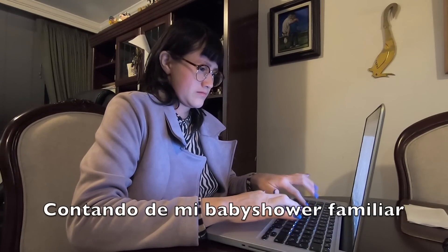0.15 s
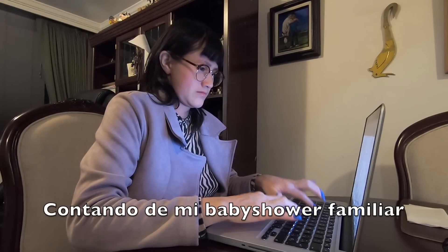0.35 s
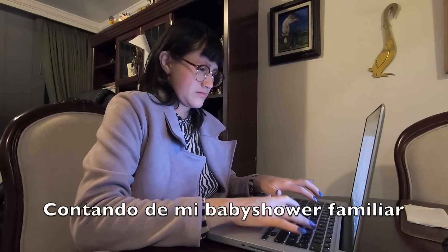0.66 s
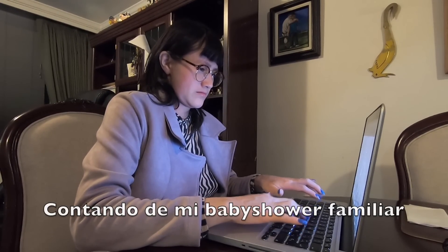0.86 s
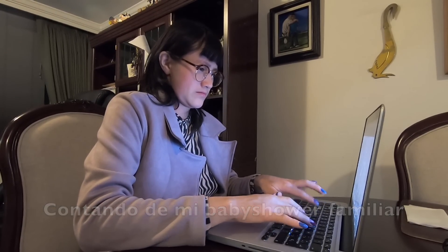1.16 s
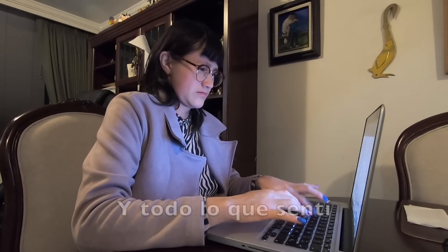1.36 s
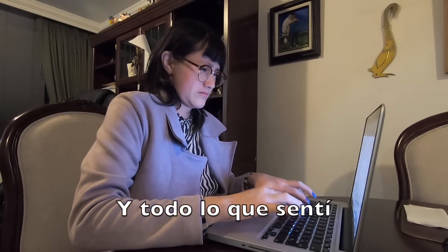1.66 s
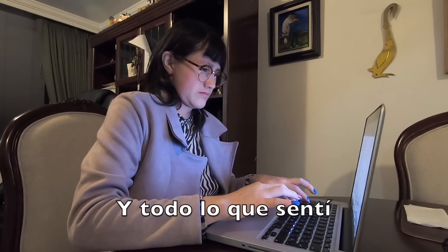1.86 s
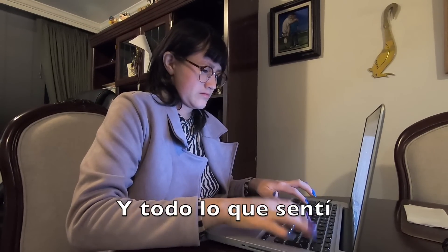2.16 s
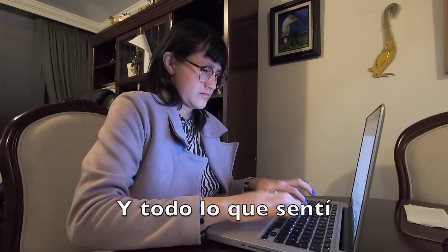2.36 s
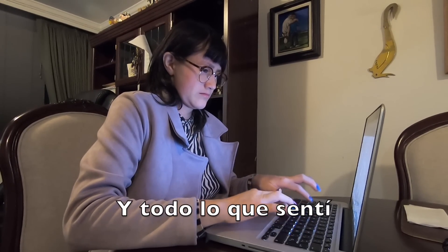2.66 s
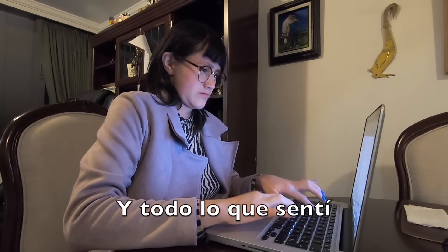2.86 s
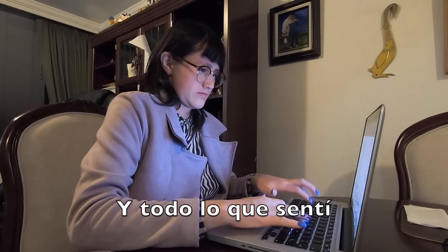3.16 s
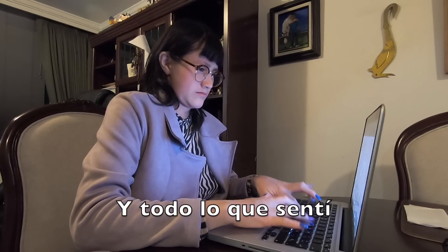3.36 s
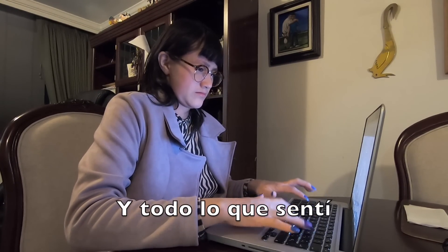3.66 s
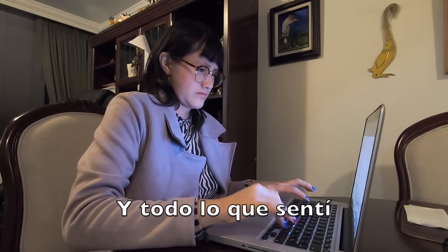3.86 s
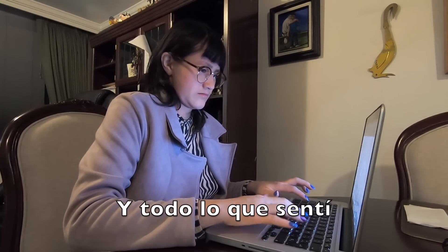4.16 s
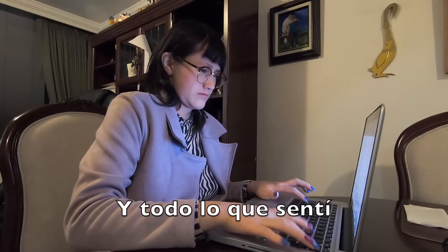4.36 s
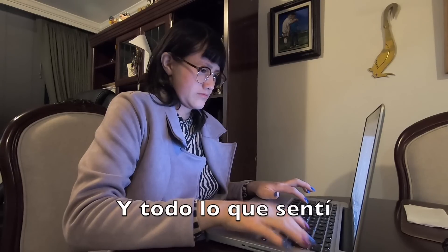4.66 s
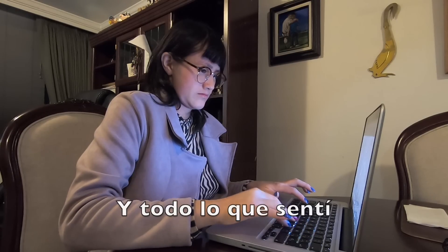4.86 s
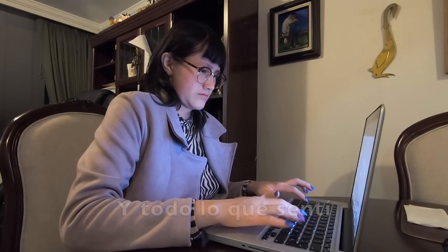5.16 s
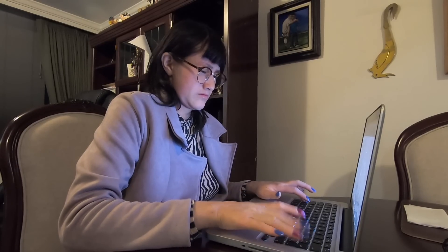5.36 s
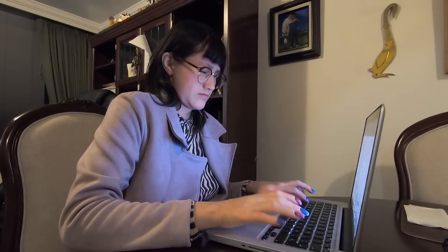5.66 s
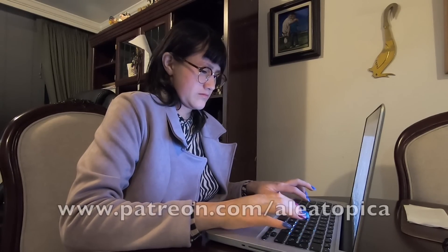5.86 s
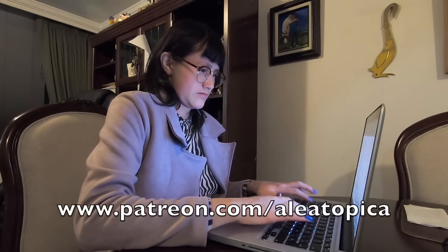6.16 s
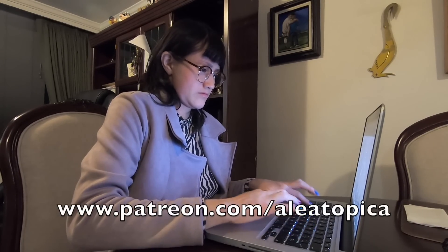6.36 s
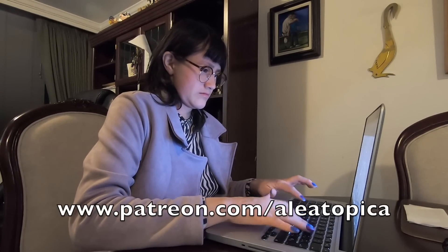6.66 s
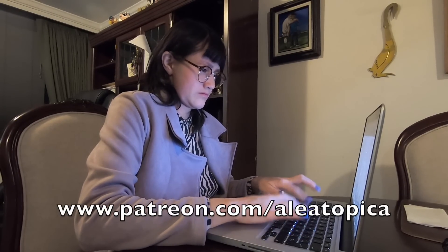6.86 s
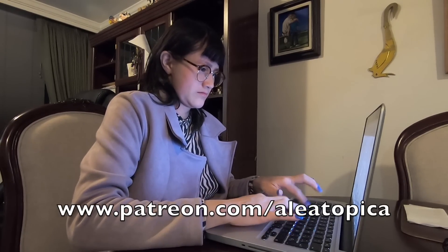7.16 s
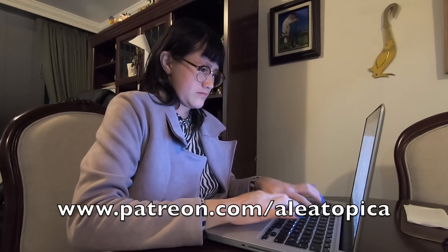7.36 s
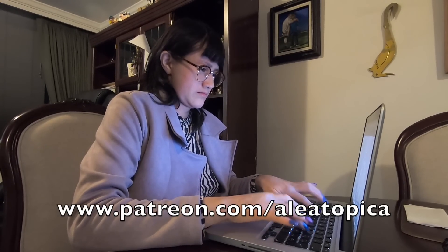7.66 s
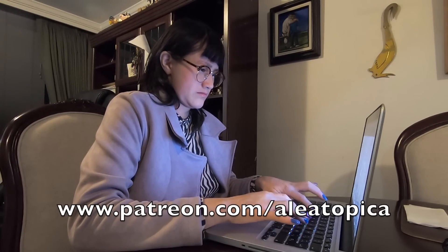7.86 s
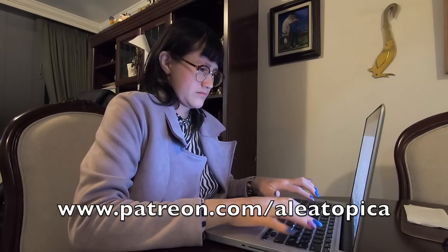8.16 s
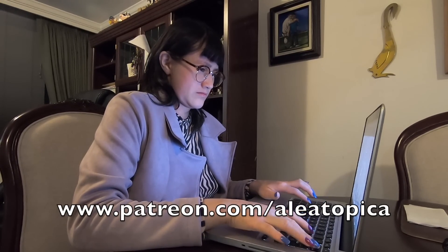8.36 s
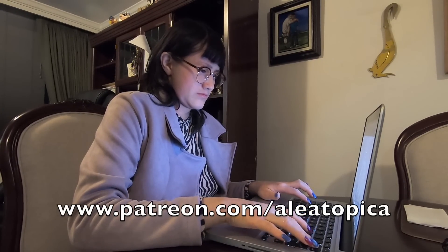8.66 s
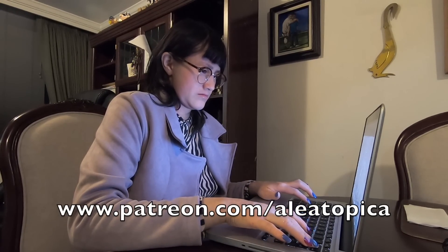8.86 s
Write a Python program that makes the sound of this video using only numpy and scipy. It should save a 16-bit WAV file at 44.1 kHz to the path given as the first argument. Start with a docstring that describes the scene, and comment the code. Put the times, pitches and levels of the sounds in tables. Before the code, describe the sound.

Someone types on a laptop with long nails, heard close up in a quiet furnished room. Nail strokes are short, bright clicks; finger pads make duller taps, and some keys clack softly as they spring back. The typing starts at once and runs quickly until about 1.7 seconds, pauses briefly, then continues from 2.1 to 4 seconds. It turns sparser and more hesitant until about 6 seconds, when another fast run begins and lasts to around 8 seconds. The strokes shake the table under the microphone, giving a low rumble, with deeper thumps from the space bar at about 2.1, 4.4, 5.5, 6.1 and 8.3 seconds. That last thump ends the typing. Near walls add a slight, short reflection. A faint far-off drone, a low building hum and a soft hiss continue throughout, remaining until the end at about 9 seconds.

```python
"""Quick typing with long nails on a laptop that lies on a table in a quiet furnished room.
Each stroke clicks a key cap, rings the case and knocks the laptop on its feet; near walls
throw the sound back. Nails click short and bright, finger pads longer and duller.
The blows also shake the table under the microphone, most of all those on the space bar.
Behind it all are a far-off drone with faint tones, the building's low murmur and a soft hiss."""
import sys
import numpy as np
from scipy import signal
from scipy.fft import rfft, irfft, next_fast_len
from scipy.io import wavfile

SR = 44100
rng = np.random.default_rng(int(sys.argv[2]) if len(sys.argv) > 2 else 0)


def store_pcm(level_fs):
    """Save levels as 16-bit WAV."""
    pcm = np.round(np.clip(level_fs, -1, 1) * 32767).astype(np.int16)
    wavfile.write(sys.argv[1], SR, np.atleast_2d(pcm).T)


N = 397341
TIME = np.arange(N) / SR
TOUCH_S = .012  # from the finger's first touch until the key hits bottom
PAD_CAP_DB, NAIL_CAP_DB = 3, -8  # the cap's dull clack compared with the bright snap

# strokes on the letter keys:
# (time [s], nail share [0 finger pad to 1 nail tip], click [dB], case ring [dB], low knock [dB])
LETTERS = [(.006, 0.54, -55, -56, -57), (0.12, 0.14, -55.5, -52, -67), (.190, 0.64, -50, -62, -87),
           (.346, 1, -52, -64.5, -89), (.413, .65, -45, -63, -62), (.531, 0.15, -58.5, -45.5, -46),
           (.660, 0.39, -64.5, -64.5, -71), (.830, 1, -47.5, -50, -48.5), (.954, 1, -48, -59, -54),
           (1.176, 0.36, -65, -65.5, -63), (1.261, 0.38, -57, -61.5, -66), (1.432, 1, -54, -75, -61),
           (1.606, 1, -52.5, -57.5, -62.5), (1.732, 0.92, -51.5, -53.5, -58.5),
           (2.318, 0.62, -50, -48.5, -49), (2.535, 1, -47.5, -54, -57), (2.674, 0.17, -51, -51, -58),
           (2.762, 0.87, -56, -49.5, -87), (2.873, 0.72, -49.5, -58, -63), (2.925, 0, -48, -52.5, -52.5),
           (3.061, 0.17, -56.5, -52, -54), (3.201, 0.13, -71, -53.5, -95),
           (3.235, 0.84, -45.5, -55.5, -54.5), (3.379, 1, -46, -55.5, -55), (3.510, 0.72, -50.5, -63, -61),
           (3.629, 0.44, -66.5, -67, -60), (3.678, 0.42, -73, -70.5, -63), (3.765, 0.12, -77, -77, -79),
           (3.902, 0.5, -56.5, -59, -54), (4.09, 0.14, -47, -48.5, -55), (4.618, 0, -75, -67.5, -70),
           (4.726, 0.24, -70, -82, -77), (4.859, 0.69, -58.5, -68, -87), (4.882, 0, -70, -57, -83),
           (5.113, 0.071, -47.5, -50.5, -46.5), (5.296, 0.23, -56.5, -72, -84),
           (5.322, 0, -63.5, -59, -62.5), (5.815, 0, -83.5, -77, -110), (5.968, 0.75, -53, -65, -64),
           (6.231, 0.12, -65.5, -66, -60), (6.253, .5, -81, -54.5, -87), (6.338, 0.41, -70, -63.5, -92),
           (6.359, 1, -48.5, -61, -59.5), (6.442, 0.5, -49.5, -60.5, -56.5), (6.603, 1, -50.5, -61, -58.5),
           (6.703, 0, -70.5, -57.5, -62), (6.799, 1, -51, -62.5, -52.5), (6.926, 0.021, -68, -53, -55),
           (7.033, 0.98, -51, -62, -67), (7.166, 0.28, -44.5, -52.5, -54.5), (7.247, 0.84, -48, -61, -66),
           (7.407, 0.89, -52.5, -63.5, -56.5), (7.455, .6, -46, -60.5, -56),
           (7.605, 0.75, -48.5, -63.5, -57), (7.676, 1, -46, -55.5, -59), (7.823, 0.81, -57, -61.5, -67),
           (7.948, 1, -63, -71, -85), (8.067, 0.12, -79, -73, -73)]
# thumb blows on the space bar, after which the table swings:
# (time [s], click [dB], case ring [dB], low knock [dB], swing [dB], swing pitch [Hz], swing length [s])
SPACES = [(2.135, -60, -54, -44, -23.5, 48.5, 0.16), (4.366, -59, -55.5, -47.5, -23, 48, 0.17),
          (5.457, -54, -46.5, -38, -22.5, 57.5, .2), (6.142, -64, -50.5, -47, -22, 61.2, 0.088),
          (8.314, -66.5, -57.5, -48.5, -24, 47.3, 0.16)]
# the tones at which the laptop's case rings: (pitch [Hz], level [dB], time to fade by 60 dB [s])
CASE_TONES = [(743, 3.5, 0.039), (833, -3.5, 0.14), (878, 0, 0.073), (964.7, -2.5, 0.093),
              (1015.4, -2.5, 0.099), (1098, -4.5, 0.12), (1219, -3.5, 0.068), (1328, 1.5, 0.031),
              (1443, 1.5, 0.026), (1526, -8.5, 0.07), (1670, -2, 0.027), (1944, -3, 0.016),
              (2496, -3, 0.011)]
# tone colour of a key's bright snap: (frequency [Hz], level [dB])
SNAP_COLOUR = [(3000, -45.5), (6000, -26), (7200, -3.5), (8200, 0), (9300, -5), (10000, -12),
               (10800, -19.5), (12200, -17.5), (13500, -35), (14600, -25.5), (16000, -49.5)]
# tone colour of a key cap's dull clack: (frequency [Hz], level [dB])
CAP_COLOUR = [(400, -42.5), (1400, -6.5), (2200, -8.5), (3600, -7.5), (4200, -3.5), (5400, 0.5),
              (6600, -4.5), (8000, -19), (10500, -29.5), (16000, -58)]


def amp(db):
    """Turns decibels into a gain."""
    return 10 ** (np.asarray(db) / 20)


def evened(x):
    """Scales a signal to an average power of one."""
    return x / np.sqrt(np.mean(x ** 2) + 1e-20)


def read(points, hz):
    """Looks up values between a table's frequencies, with octaves evenly spaced."""
    known_hz, value = np.transpose(points)
    return np.interp(np.log(hz + 1), np.log(known_hz + 1), value)


def level(curve):
    """Turns a decibel curve into a gain for every sample."""
    return amp(np.interp(TIME, *np.transpose(curve)))


def add(mix, s, sound):
    """Mixes a sound in at s seconds, or at the start if s is negative."""
    part = mix[:, max(round(s * SR), 0):][:, :sound.shape[-1]]
    part += sound[..., :part.shape[1]]


def pair(size, likeness):
    """Left and right white noise, partly alike."""
    left, other = rng.standard_normal((2, size))
    return np.array([left, likeness * left + np.sqrt(1 - likeness ** 2) * other])


def lean(right_db):
    """Left and right gains that put the right side right_db above the left."""
    return evened(amp(np.array([[0], [right_db]])))


def noise(colour, likeness):
    """Steady stereo noise of a given tone colour."""
    size = next_fast_len(N)
    gain = amp(read(colour, np.fft.rfftfreq(size, 1 / SR)))
    return evened(irfft(rfft(pair(size, likeness)) * gain, size)[:, :N])


def tick(colour, size=512):
    """The shortest pulse that has this tone colour."""
    log_gain = np.log(amp(read(colour, abs(np.fft.fftfreq(size, 1 / SR)))))
    spectrum = np.exp(np.conj(signal.hilbert(log_gain)))
    return np.fft.ifft(spectrum).real[None, :size // 2]


def sized(sound, db, span_s):
    """Gives a blow the energy of that level held for span_s seconds."""
    return sound * amp(db) * np.sqrt(2 * span_s * SR / (np.sum(sound ** 2) + 1e-20))


def later(sound, delay_s, size=4096):
    """Delays a short sound by any fraction of a sample."""
    hz = np.fft.rfftfreq(size, 1 / SR)
    return irfft(rfft(sound, size) * np.exp(-2j * np.pi * hz * delay_s), size)


def waver(count=60):
    """A slow drift through count random values."""
    return evened(signal.resample(rng.standard_normal(count), next_fast_len(N))[:N])


def whine(hz, db, peak_s, half_s):
    """One faint tone that swells, wavers and fades."""
    turns = np.cumsum(hz + 3 * waver(count=200)) / SR
    swell = amp(db) * np.exp(-((TIME - peak_s) / half_s) ** 2)
    return swell * (1 + 0.36 * waver()) * np.sin(2 * np.pi * turns)


def background():
    """A far-off drone that wavers in level, faint tones in it, the building's low murmur, and hiss."""
    # tone colours of the three noises: (frequency [Hz], level [dB])
    drone_colour = [(150, -21), (400, 7), (540, -3), (620, 2), (850, 1), (1100, -5.5), (1550, -5),
                    (2000, -10.5), (3000, -19.5), (6000, -44)]
    murmur_colour = [(20, 9), (60, -17), (90, -21.5), (125, -2.5), (155, 5.5), (195, 3), (250, -5.5),
                     (285, -11), (350, -13), (450, -34.5), (800, -30), (2000, -82)]
    hiss_colour = [(300, 5), (2000, -2.5), (5000, -1.5), (8500, -4), (11000, -14), (16000, -32.5)]
    # slow rise and fall of the drone and the murmur: (time [s], level [dB])
    drone_curve = [(0, -71), (1.9, -74), (3.8, -73), (4.6, -69.5), (5.8, -71.5), (7, -69.5), (8.2, -71),
                   (9, -70.5)]
    murmur_curve = [(0, -56.5), (1.9, -62.5), (2.6, -56.5), (5.8, -59), (6.3, -54.5), (9, -56)]
    # tones that come and go in the drone: (pitch [Hz], level [dB], loudest at [s], half length [s])
    faint_tones = [(618, -76, 8.7, .9), (632, -81, 5.6, .8), (1355, -87, 4.9, 1.2), (1505, -87, 8.7, .4),
                   (1603, -87, 8.7, .5)]
    drone = noise(drone_colour, likeness=0.073) * level(drone_curve) * amp(1.44 * waver())
    drone += sum(whine(*row) for row in faint_tones)
    murmur = amp(0.5) * noise(murmur_colour, likeness=0.82) * level(murmur_curve)
    hiss = amp(-84.5) * noise(hiss_colour, likeness=.1)
    return lean(1.4) * drone + lean(1.1) * murmur + hiss


def trembling(lead_s=0.041, letter_db=-33.5, bar_db=-36, letter_rise_s=0.1, bar_rise_s=0.15):
    """How strongly the table trembles: each stroke adds a swell as the finger nears, then it settles."""
    # weight of the hands on the table: (time [s], level [dB])
    hand_weight = [(0, 2.5), (1.1, 3), (1.65, -0.5), (2.3, -5), (2.75, 1), (3.8, -3), (4.3, 2), (4.7, 1.5),
                   (4.95, -14.5), (5.3, 2), (6.2, 0), (6.65, -8), (7, 2), (8.3, -7.5)]
    firm_db, follow = -64, .16  # knock of a firm stroke, and how far the trembling follows the knock
    pushes = [(s, letter_db + follow * (knock_db - firm_db), letter_rise_s)
              for s, *_, knock_db in LETTERS]
    pushes += [(s, bar_db, bar_rise_s) for s, *_ in SPACES]
    power = np.full((1, N), amp(-80) ** 2)  # the table at rest
    t = np.arange(SR) / SR
    for s, db, rise_s in pushes:
        start = s - lead_s
        age = (t + max(-start, 0)) / rise_s
        swell = amp(db) * (age * np.exp(1 - age)) ** 2.41
        add(power, start, swell ** 2)
    return np.sqrt(power) * level(hand_weight)


def table(swing_lag_s=0.0212):
    """The table trembles, and swings after each space; the microphone stand carries it mostly right."""
    # tone colour of the trembling table: (frequency [Hz], level [dB])
    tremble_colour = [(8, -36), (20, 2), (32, 4.5), (45, -0.5), (68, 3.5), (85, -7.5), (100, -17.5),
                      (130, -13), (190, -19), (260, -33), (400, -51), (900, -82)]
    shake = noise(tremble_colour, likeness=0.49) * trembling() * amp(-3.5)
    for s, *_, db, hz, length_s in SPACES:
        progress = np.arange(0, 1, 1 / (length_s * SR))
        swell = amp(db) * np.sin(np.pi * progress ** 0.7) ** 2
        add(shake, s + swing_lag_s, swell * np.sin(2 * np.pi * hz * length_s * progress))
    left, right = shake
    bass_cut = signal.butter(1, 170, "high", fs=SR, output="sos")
    return np.array([amp(-24.5) * left + amp(-7.0) * signal.sosfilt(bass_cut, left), right])


def click(rattle_s, snap_db, cap_db, blow_db, cap_colour=CAP_COLOUR, size=2800):
    """The finger lands, the key hits bottom in one sharp blow, then the cap chatters on its hinge."""
    bottom = round(TOUCH_S * SR)
    t = (np.arange(size) - bottom) / SR
    flicker = amp(6.5 * np.repeat(rng.standard_normal(size), 16)[:size])
    chatter = np.exp(-abs(t) / rattle_s) * flicker
    landing = amp(-19.5) * np.exp(-abs(t) / (4 * rattle_s + 0.001))  # a loose stroke lands more slowly
    force = pair(size, likeness=0.93) * np.where(t < 0, landing, chatter)
    force[:, bottom] += amp(blow_db)
    snap = sized(signal.fftconvolve(force, tick(SNAP_COLOUR), axes=1), snap_db, span_s=0.01)
    clack = sized(signal.fftconvolve(force, tick(cap_colour), axes=1), cap_db, span_s=0.01)
    lag_s = np.array([[0], [2.5e-5]])  # the microphone's right side is a little farther from the keys
    return lean(3.0) * later(snap + clack, lag_s)


def ring(tones, db, tilt_db, spread_db, width, rise_s, size=6000):
    """A struck body's fading tones, tilt_db louder per octave; each key's spot mixes them anew."""
    t = np.arange(size) / SR
    hz, tone_db, fade_s = np.transpose(tones)[:, :, None]
    weight, detune, phase, apart = rng.standard_normal((4, len(tones), 1))
    start_db = tone_db + tilt_db * np.log2(hz / hz[0]) + spread_db * weight
    envelope = amp(start_db - 60 * t / fade_s) * (1 - np.exp(-t / rise_s))
    angle = 2 * np.pi * (hz * (1 + 0.0079 * detune) * t + phase)
    sides = [(envelope * np.sin(angle + side * width * apart)).sum(0) for side in (-1, 1)]
    return sized(np.array(sides), db, span_s=0.014)


def stroke(rattle_s, snap_db, cap_db, ring_db, knock_db, extra_tilt_db=0, heavy_db=-55):
    """A key clicks and rings going down and, softly, springing back; the laptop knocks on its feet."""
    # tones of the laptop on its feet: (pitch [Hz], level [dB], time to fade by 60 dB [s])
    feet_tones = [(198.4, 1.5, 0.12), (259.4, 0, 0.052), (328.4, -0.5, 0.075), (358.8, -6, 0.13),
                  (494, 1.5, 0.021), (635, -5, 0.045)]
    cap_pitch = 1 + 0.045 * rng.uniform(-1.84, 2.8)  # key caps differ a little in pitch
    cap_colour = np.array(CAP_COLOUR) * [cap_pitch, 1]
    held_s = rng.uniform(.075, .105)
    clicks, case = np.zeros((2, 2, SR // 5))
    add(clicks, 0, click(rattle_s, snap_db, cap_db, blow_db=14, cap_colour=cap_colour))
    add(clicks, held_s, click(0.0023, snap_db - 22, cap_db - 18, blow_db=5, cap_colour=cap_colour))
    # heavy blows last longer and so favour the low tones of the case
    tilt_db = 4 - 0.93 * max(ring_db - heavy_db, 0) + extra_tilt_db
    for s, db in ((0, ring_db), (held_s, ring_db - 16)):
        add(case, s, lean(5.5) * ring(CASE_TONES, db, tilt_db, spread_db=3, width=0.59, rise_s=0.0014))
    knock = ring(feet_tones, knock_db, tilt_db=0, spread_db=2, width=0.52, rise_s=0.0032)
    add(case, 0, lean(6.1) * knock)
    return clicks, case


def letter(nail, click_db, ring_db, knock_db, pad_rattle_s=0.0034, nail_rattle_s=0.0011):
    """A finger hits a letter key: the more nail, the shorter and brighter the click."""
    rattle_s = pad_rattle_s * (nail_rattle_s / pad_rattle_s) ** nail
    cap_db = click_db + PAD_CAP_DB + (NAIL_CAP_DB - PAD_CAP_DB) * nail
    return stroke(rattle_s, click_db, cap_db, ring_db, knock_db)


def thuds(bar_boost_db=2):
    """The knock of each stroke also sounds the table top, the thumb's more than a finger's."""
    # tones of the table top: (pitch [Hz], level [dB], time to fade by 60 dB [s])
    top_tones = [(116, 0, 0.26), (140, 1.5, .2), (169, 0, .18)]
    knocks = [(s, knock_db) for s, *_, knock_db in LETTERS]
    knocks += [(s, knock_db + bar_boost_db) for s, _, _, knock_db, *_ in SPACES]
    out = np.zeros((2, N))
    for s, db in knocks:
        add(out, s, lean(11) * ring(top_tones, db, tilt_db=0, spread_db=4, width=0.66, rise_s=0.013))
    return out


def room_decay(build_s=0.0088, size=17000):
    """The shape of the room's lingering sound: it builds up, then each band fades at its own speed."""
    # how long the room rings: (frequency [Hz], time to fade by 60 dB [s])
    fade_times = [(150, 0.28), (1000, 0.25), (4000, 0.34), (8000, 0.26), (14000, 0.27)]
    hz, t, _ = signal.stft(np.zeros(size), SR, nperseg=256)
    return amp(-60 * t / read(fade_times, hz)[:, None]) * (1 - np.exp(-(t / build_s) ** 2))


def in_room(sound, decay, echo_db, tail_db):
    """Direct sound, single bounces and a lingering tail; the paths differ a little from key to key."""
    # bounces off near walls: (delay [s], left level [dB], right level [dB])
    bounces = [(.0052, -10.5, -14), (.0070, -4, -10.5), (.0079, -14, -7.5), (.0093, -5, -21.5),
               (0.01, -14.5, -16), (0.016, -19, -39), (0.021, -12.5, -37), (.0254, -20, -18),
               (0.028, -13, -23.5)]
    real, imag = rng.standard_normal((2, 2) + decay.shape)
    tail = signal.istft(decay * (real + 1j * imag), SR, nperseg=256)[1]
    response = amp(tail_db) * lean(-3.0) * tail / np.linalg.norm(tail[0])
    response[:, 0] += 1  # the direct sound
    for (delay_s, *side_db), shift in zip(bounces, rng.standard_normal((len(bounces), 2))):
        at = (SR * delay_s * (1 + .012 * np.clip(shift, -2, 2))).astype(int)
        response[np.arange(2), at] += amp(echo_db + np.array(side_db))
    return signal.fftconvolve(sound, response, axes=1)


def release(click_db, ring_db, rattle_s=0.0038):
    """A freed key hits its upper stop, chatters and rings the case."""
    clicks = click(rattle_s, snap_db=click_db, cap_db=click_db + 1.3, blow_db=9)
    case = ring(CASE_TONES, ring_db, tilt_db=4, spread_db=1, width=0.83, rise_s=0.0012)
    return clicks, lean(6) * case


def space_bar(click_db, ring_db, knock_db, rattle_s=0.007):
    """The long bar rattles under the flat of the thumb."""
    return stroke(rattle_s, click_db, click_db + PAD_CAP_DB, ring_db, knock_db, extra_tilt_db=7)


def typing():
    """Letters, spaces and released keys, each heard with its echoes."""
    # keys that are let go abruptly and clack back up: (time [s], click [dB], case ring [dB])
    releases = [(0.092, -61.5, -69), (.488, -58, -58.5), (1.040, -71.5, -61.5), (2.206, -65, -61),
                (2.610, -72, -61), (2.790, -59, -66), (3.015, -55, -56.5), (3.140, -68, -59),
                (3.553, -69.5, -58), (4.186, -59, -58.5), (5.189, -58, -56), (6.512, -55.5, -56),
                (6.887, -74, -68), (7.541, -56, -55.5)]
    blows = [(s, letter(*row)) for s, *row in LETTERS]
    blows += [(s, space_bar(*row[:3])) for s, *row in SPACES]
    blows += [(s, release(*row)) for s, *row in releases]
    out, decay = np.zeros((2, N)), room_decay()
    for s, (clicks, case) in blows:
        add(out, s - TOUCH_S, in_room(clicks, decay, echo_db=2.5, tail_db=-1.5))
        add(out, s, in_room(case, decay, echo_db=-4.5, tail_db=-2.0))
    return out


def scene():
    """The keys, the thudding and shaking table, and the quiet background."""
    return typing() + thuds() + table() + background()


def record(dry):
    """Cuts the treble above 16 kHz."""
    treble_cut = signal.firwin(255, 16000, window=("kaiser", 9), fs=SR)
    return signal.oaconvolve(dry, treble_cut[None], "same")


dry = scene()
out = record(dry)
store_pcm(out)
```